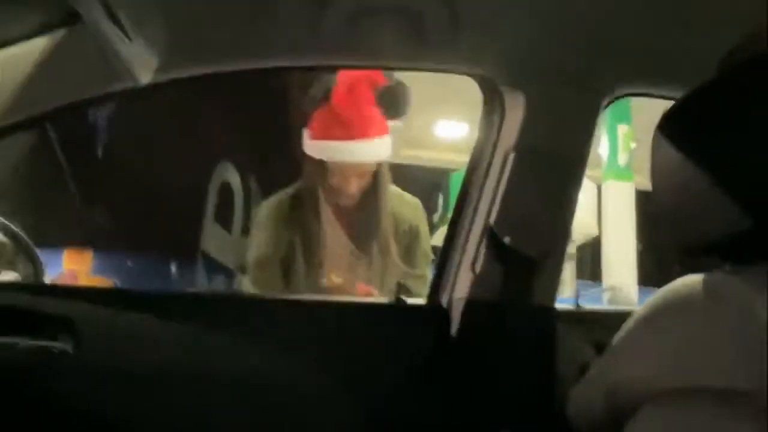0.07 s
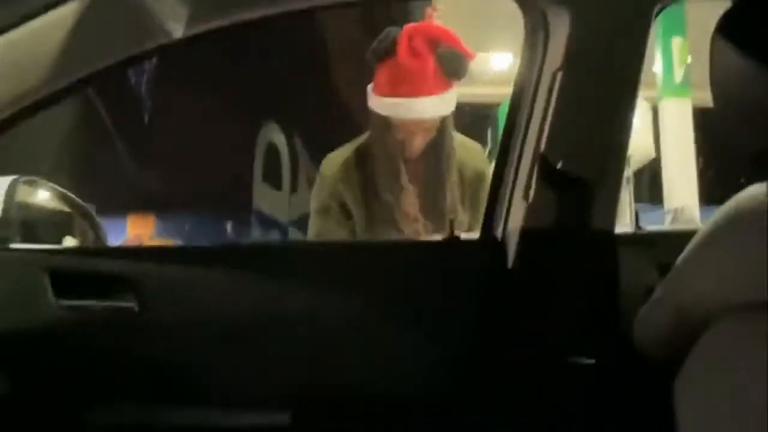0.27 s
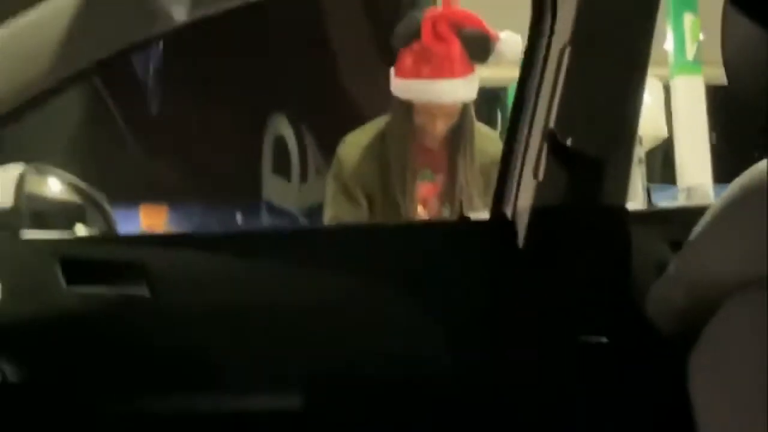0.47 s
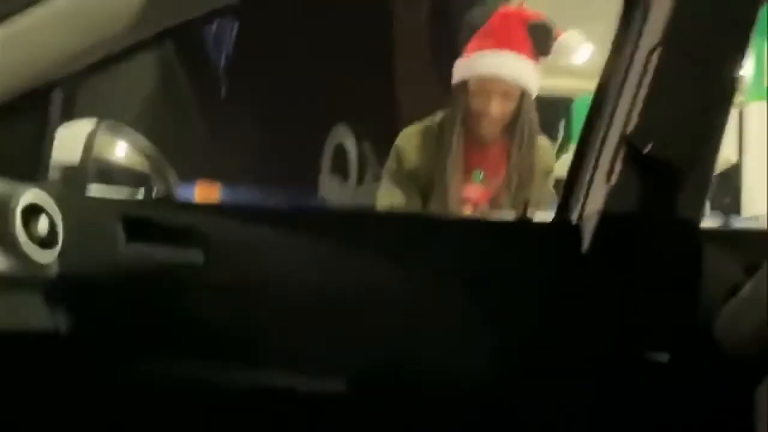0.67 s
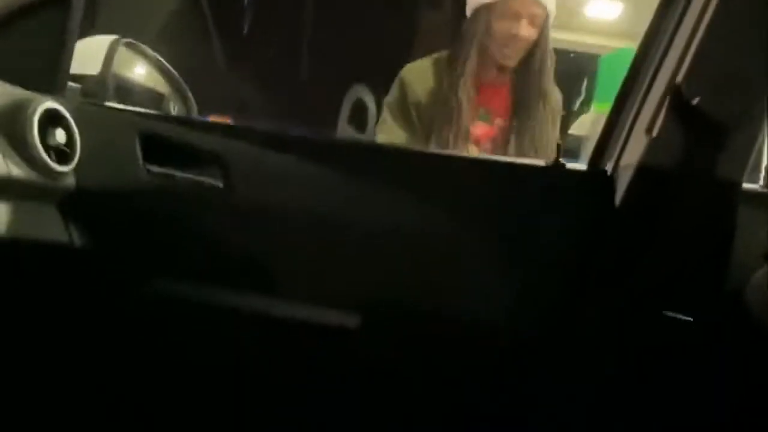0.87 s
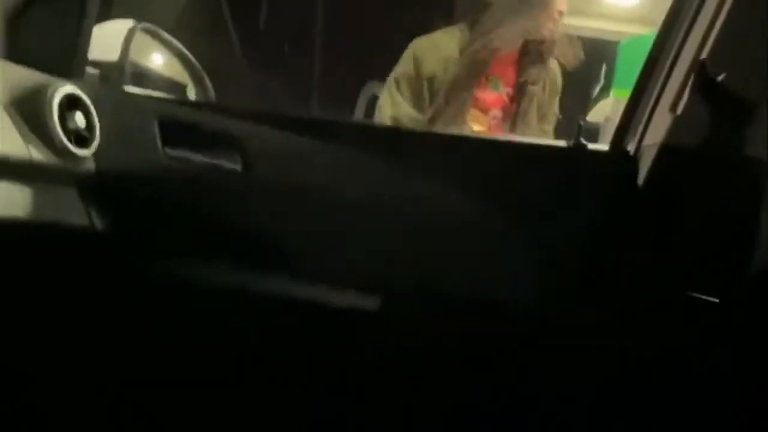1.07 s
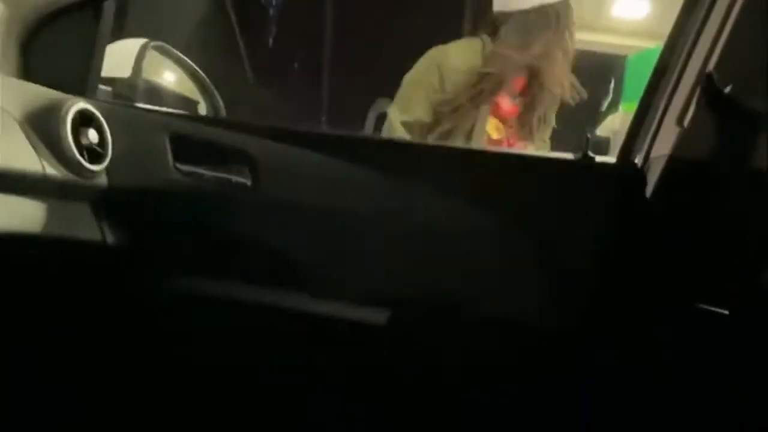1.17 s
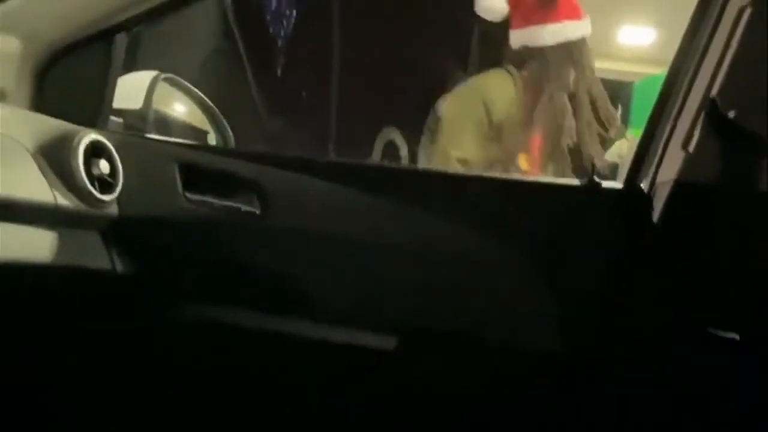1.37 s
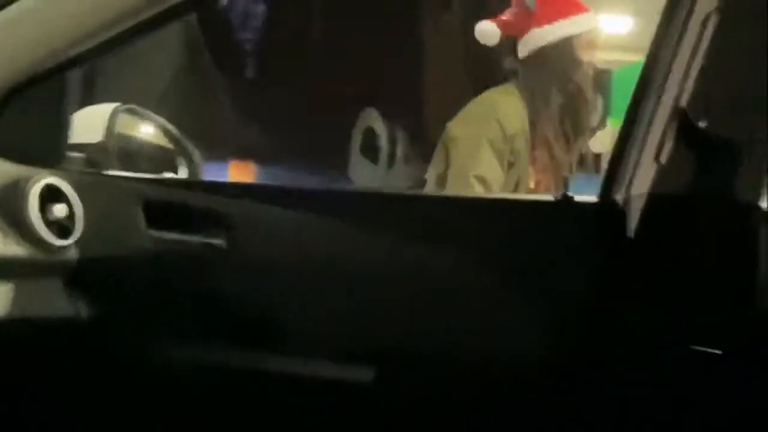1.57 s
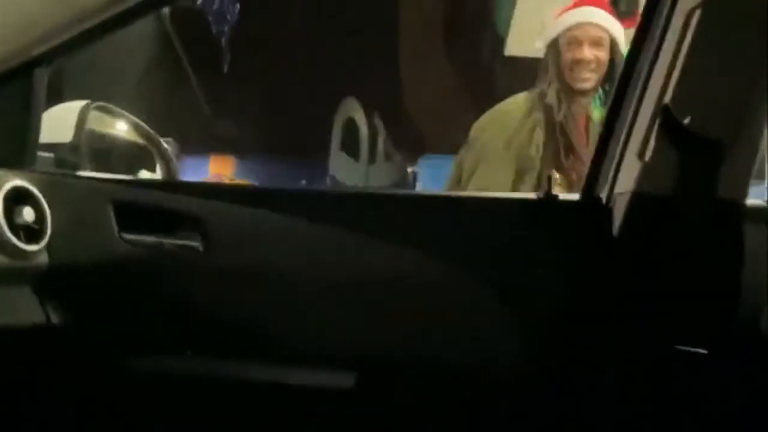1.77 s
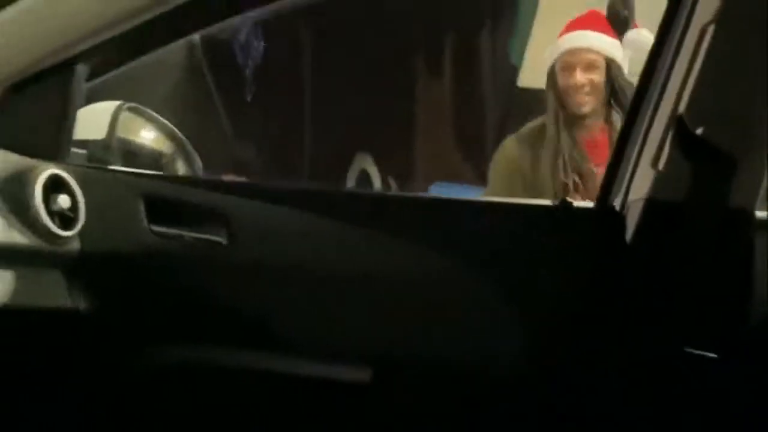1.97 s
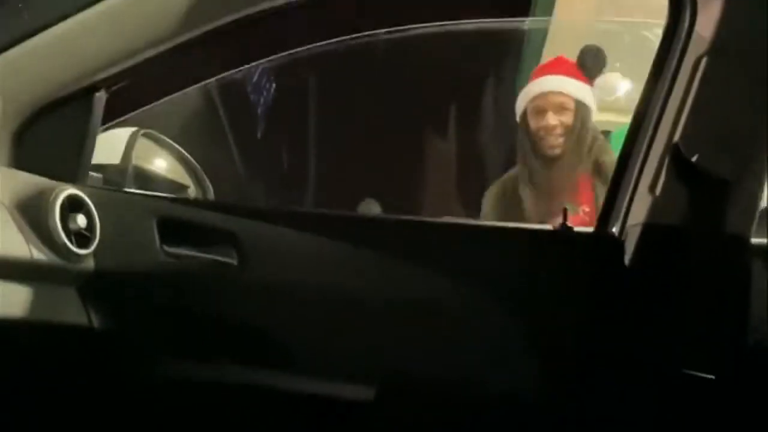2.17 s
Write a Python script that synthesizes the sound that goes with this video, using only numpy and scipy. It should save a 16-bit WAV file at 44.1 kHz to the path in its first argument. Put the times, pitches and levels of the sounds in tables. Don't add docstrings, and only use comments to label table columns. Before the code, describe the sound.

A car's electric window motor jolts on with dull thumps and clacks, the seal squeaks, a steady whine follows, then a clack and thump stop it; idling engine and faint cloth rustle, heard inside the cabin.

```python
import sys
import numpy as np
from scipy import signal
from scipy.fft import rfft, irfft
from scipy.io import wavfile
from scipy.ndimage import uniform_filter1d

SR = 44100
rng = np.random.default_rng(int(sys.argv[2]) if len(sys.argv) > 2 else 0)


def to_wav(s):
    ch = np.atleast_2d(s).T
    pcm = np.round(np.clip(ch, -1, 1) * 32767)
    wavfile.write(sys.argv[1], SR, pcm.astype(np.int16))


def how_loud(loudness_db):
    steps = np.asarray(loudness_db, float) / 20
    return 10 ** steps


N = 98254

# (frequency [Hz], density [dB per Hz])
CABIN_COLOUR = [(12, -26), (28, -21), (55, -2.5), (130, -7), (235, -16.5), (340, -12.5), (650, -30.5),
                (1080, -37), (1280, -68), (22000, -120)]
CABIN_DB = -45.5
# (frequency [Hz], width [Hz], level [dB])
CABIN_MODES = [(62, 43, -48.5), (125, 29, -58), (170.5, 80, -51.5), (354.5, 36, -62), (485.7, 58, -62.5)]
# (multiple of the crank speed, level [dB])
CRANK_ORDERS = [(2, -57), (3, -65), (6, -50), (8, -62), (10, -62), (12, -59), (14, -56), (14.5, -63),
                (15, -54), (16, -55), (18, -63), (22, -66), (26, -62), (28, -63), (30.61, -57), (32, -65),
                (40, -71)]
IDLE_HZ, FIRST_BEAT_S = 11.72, 0.036
TIGHT_ORDER, SMEAR_ORDERS = 15, 5.5
# (frequency [Hz], density [dB per Hz])
HISS_COLOUR = [(300, -15), (1500, -4.5), (3000, -5.5), (6800, -7), (7500, -11.5), (11000, -15.5),
               (16000, -18.5)]
HISS_DB = -87.5
# (frequency [Hz], gain [dB])
MICROPHONE = [(20, -2), (6300, -2), (7000, -6.5), (7600, -13), (8300, -8), (9300, -10), (10600, -6),
              (11800, -17.5), (13000, -62)]
# (frequency [Hz], density [dB per Hz])
CLOTH_COLOUR = [(300, -26), (700, -2.5), (1200, -1.5), (1700, -8), (2400, -4), (4000, -7.5), (6500, -10),
                (12000, -24.5)]
# (time [s], level [dB])
CLOTH_RUB = [(0, -100), (.12, -86), (.17, -77.5), (.3, -71), (.48, -73), (.58, -65.5), (.65, -74.5),
             (.73, -73.5), (.83, -66), (.89, -76.5), (1.0, -78), (1.24, -94.5), (1.33, -83), (1.4, -62.5),
             (1.44, -74.5), (1.456, -62), (1.485, -81), (2.23, -84)]
# (time [s], peak level [dB], pitch [Hz], decay time t60 [s])
THUMPS = [(1.531, -13, 134.4, 0.094), (1.547, -16.5, 62, 0.32), (1.562, -10, 125, 0.078),
          (1.597, -21.5, 121.6, 0.28), (1.62, -17.5, 62, 0.245), (1.677, -19, 133.4, 0.095),
          (1.735, -21.5, 74.6, .18), (1.795, -26, 59.4, 0.38), (1.845, -31, 65.5, 0.12),
          (2.085, -9.5, 130, 0.033), (2.096, -11.5, 125, 0.1), (2.091, -27, 59.8, 1)]
SWELL_S = 0.005
SAG, SAG_S = 0.085, 0.018
SHAKE_DB, SHAKE_FADE_S, SHAKE_HZ, SHAKE_WIDTH_HZ = -31, 0.096, 38, 30
# (frequency [Hz], level [dB], nominal decay time [s], about 3/4 of the true t60)
PANEL_MODES = [(291, 8, 0.042), (373, 4.5, .04), (480, -1, 0.063), (633, -6.5, 0.055), (722, -5, 0.08),
               (802, -13, 0.057), (940, -12, 0.11), (1140, -37, 0.084), (1437, -18, 0.099),
               (2220, -24.5, 0.028)]
# (time [s], level [dB], length [s])
CLACKS = [
    (1.41, -59, 0.09),
    (1.461, -48.5, 0.013),
    (1.527, -36.5, 0.036),
    (1.552, -32.5, 0.037),
    (1.605, -42, 0.033),
    (1.628, -46, 0.095),
    (2.044, -43.5, 0.051),
]
# (frequency [Hz], density [dB per Hz])
SLIDE_COLOUR = [(200, -25), (500, -9.5), (900, -15), (1900, -16), (3500, -20.5), (4800, -20.5), (6500, -24),
                (12000, -31.5)]
# (time [s], level [dB])
GLASS_TRAVEL = [(1.5, -77), (1.55, -46), (1.61, -52.5), (1.72, -53), (2.06, -52.5), (2.095, -57),
                (2.13, -52.5), (2.2, -50), (2.23, -54.5)]
# (frequency [Hz], width [Hz], level [dB])
SEAL_MODES = [(2275, 95, 2), (3090, 150, -7.5), (3900, 83, -10), (4270, 270, -14), (5130, 30, -9),
              (8100, 87, -8)]
# (time [s], length [s], level [dB], first band [Hz], last band [Hz])
SEAL_SLIPS = [
    (1.518, 0.051, -55.5, 1200, 2400),
    (1.562, .04, -60.5, 5000, 6300),
    (1.626, 0.057, -43, 5850, 2470),
    (1.674, 0.041, -50, 4800, 4500),
]
SLIP_WIDTH_HZ, SLIP_AIR_DB = 3600, -6
# (time [s], shaft speed [Hz], load [dB])
SHAFT_RUN = [
    (1.52, 40, -30),
    (1.6, 78, -18),
    (1.685, 93.5, -12),
    (1.715, 96.4, -2),
    (1.79, 97.8, 1),
    (1.985, 96.9, -1),
    (2.008, 95.9, -5),
    (2.066, 98, 2),
    (2.085, 94, -30),
]
# (multiple of the shaft speed, level [dB])
SHAFT_ORDERS = [(1, -47), (3, -58), (7, -67), (9, -69), (10, -55.5), (12, -69), (19, -74), (20, -68),
                (40, -78), (45, -80), (50, -68), (60, -83)]
SPEED_WOBBLE = 0.0008
ROOM_T60_S, ROOM_DB = 0.09, -6


def evened(x):
    return x / np.sqrt(np.mean(x ** 2) + 1e-20)


def curve(rows, column=1):
    table = np.array(rows)
    return np.interp(np.arange(N) / SR, table[:, 0], table[:, column])


def add(mix, s, sound):
    part = mix[round(s * SR):][:len(sound)]
    part += sound[:len(part)]


def coloured(x, colour):
    f, db = np.transpose(colour)
    bins = np.fft.rfftfreq(2 * N, 1 / SR) + 1
    gain = how_loud(np.interp(np.log(bins), np.log(f + 1), db))
    return irfft(rfft(x, 2 * N) * gain)[..., :N]


def resonate(x, hz, width):
    turn = np.exp(2j * np.pi * np.cumsum(hz * np.ones(len(x))) / SR)
    r = np.exp(-np.pi * width / SR)
    return 2 * (turn * signal.lfilter([1 - r], [1, -r], x / turn)).real


def noise(colour, patchy_db, flicker_db):
    patches = rng.standard_normal((N // 128 + 9, 257)).T
    flicker = rng.standard_normal(N // 128 + 9)
    patches = uniform_filter1d(patches, size=5, axis=0)
    patches = evened(uniform_filter1d(patches, size=14, axis=1))
    z = signal.stft(rng.standard_normal(N + 512), nperseg=512, noverlap=384)[2]
    field = (patchy_db * patches + flicker_db * flicker)[:, :z.shape[1]]
    uneven = signal.istft(z * how_loud(field), nperseg=512, noverlap=384)[1][:N]
    return evened(coloured(uneven, colour))


def cabin():
    out = how_loud(CABIN_DB) * noise(CABIN_COLOUR, patchy_db=2, flicker_db=3.53)
    for hz, width, db in CABIN_MODES:
        mode = resonate(rng.standard_normal(N), hz, width)
        out = out + how_loud(db) * evened(resonate(mode, hz, 2 * width))
    return out


def engine():
    turns = IDLE_HZ * (np.arange(N) / SR - FIRST_BEAT_S)
    sway = uniform_filter1d(rng.standard_normal((len(CRANK_ORDERS), N)), size=8000, axis=1)
    out = np.zeros(N)
    for i, (k, db) in enumerate(CRANK_ORDERS):
        level = np.sqrt(2) * how_loud(db + 1.2 * evened(sway[i]))
        smear = np.pi * ((k - TIGHT_ORDER) / SMEAR_ORDERS) ** 2
        out += level * np.cos(2 * np.pi * k * turns + smear + 0.25 * evened(sway[-i]))
    return out


def room(x):
    taps = np.zeros(6000)
    at = np.arange(60, 5980, 20) + rng.integers(0, 20, 296)
    taps[at] = rng.choice([-1., 1.], len(at)) * how_loud(-60 * at / SR / ROOM_T60_S)
    tail = how_loud(ROOM_DB) * taps / np.linalg.norm(taps)
    return (x + signal.fftconvolve(x, tail)[:N]) / np.sqrt(1 + how_loud(2 * ROOM_DB))


def cloth():
    return how_loud(curve(CLOTH_RUB)) * noise(CLOTH_COLOUR, patchy_db=0.0, flicker_db=1.5)


def thumps():
    out, t = np.zeros(N), np.arange(SR // 2) / SR
    bent = t + SAG * SAG_S * (1 - np.exp(-t / SAG_S))
    for s, db, hz, t60 in THUMPS:
        envelope = how_loud(db - 60 * t / t60) * (1 - np.exp(-t / SWELL_S))
        add(out, s, -envelope * np.sin(2 * np.pi * hz * bent))
    rock = resonate(rng.standard_normal(len(t)), SHAKE_HZ, SHAKE_WIDTH_HZ)
    rock = evened(resonate(rock, SHAKE_HZ, SHAKE_WIDTH_HZ))
    swell = t / SHAKE_FADE_S * np.exp(1 - t / SHAKE_FADE_S)
    add(out, THUMPS[0][0], how_loud(SHAKE_DB) * rock * swell)
    return out


def clacks():
    drive, t = np.zeros(N), np.arange(4000) / SR
    for s, db, length in CLACKS:
        grit = rng.standard_normal(len(t)) * how_loud(rng.exponential(1, len(t)))
        envelope = np.sin(np.pi * np.minimum(t / length, 1) ** 0.55)
        add(drive, s, how_loud(db) * evened(grit) * envelope)
    ring = sum(how_loud(db + 19.5) * resonate(drive, hz, 1.64 / t60) for hz, db, t60 in PANEL_MODES)
    return coloured(ring, [(1500, -1.5), (4000, -12.5)])


def glass():
    moving = np.arange(N) / SR > GLASS_TRAVEL[0][0]
    return how_loud(curve(GLASS_TRAVEL)) * moving * noise(SLIDE_COLOUR, patchy_db=-0.5, flicker_db=1.3)


def seal():
    out = np.zeros(N)
    for s, length, db, first_hz, last_hz in SEAL_SLIPS:
        grit = rng.standard_normal(4410) * how_loud(2.0 * rng.exponential(1, 4410))
        grit = grit[:round(length * SR)]
        u = np.linspace(0, 1, len(grit))
        band = first_hz + (last_hz - first_hz) * u
        glide = resonate(resonate(grit, band, SLIP_WIDTH_HZ), band, SLIP_WIDTH_HZ)
        hiss = evened(glide) + how_loud(SLIP_AIR_DB) * evened(grit)
        ring = sum(how_loud(d + 8) * resonate(hiss, f, w) for f, w, d in SEAL_MODES)
        add(out, s, how_loud(db) * (hiss + ring) * np.sin(np.pi * u) ** 1.5)
    return coloured(out, [(500, -22), (1400, 0.5)])


def motor():
    waver = evened(uniform_filter1d(rng.standard_normal(N), size=2500))
    turns = np.cumsum(curve(SHAFT_RUN) * (1 + SPEED_WOBBLE * waver)) / SR
    flutter = uniform_filter1d(rng.standard_normal((len(SHAFT_ORDERS), N)), size=2500, axis=1)
    whine = np.zeros(N)
    for i, (k, db) in enumerate(SHAFT_ORDERS):
        level = np.sqrt(2) * how_loud(db + evened(flutter[i]))
        whine += level * np.sin(2 * np.pi * (k * turns + rng.random()))
    t = np.arange(N) / SR
    running = (t > SHAFT_RUN[0][0]) * (t < SHAFT_RUN[-1][0])
    return whine * how_loud(curve(SHAFT_RUN, column=2)) * running


def scene():
    direct = cabin() + engine() + motor() + thumps() + clacks()
    reflected = room(cloth() + glass() + seal())
    return (direct + reflected)[None]


def low_pass(x):
    return signal.sosfilt(signal.butter(12, 11900, fs=SR, output="sos"), x)


def record(dry):
    edge_s = np.minimum(np.arange(N), N - np.arange(N)) / SR
    soft = np.sin(np.pi / 2 * np.minimum(edge_s / 0.005, 1)) ** 2
    hiss = how_loud(HISS_DB) * noise(HISS_COLOUR, patchy_db=-0.7, flicker_db=-1.0)
    return low_pass(coloured(dry * soft, MICROPHONE) + hiss)


dry = scene()
out = record(dry)
to_wav(out)
```